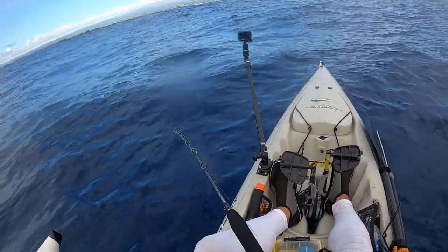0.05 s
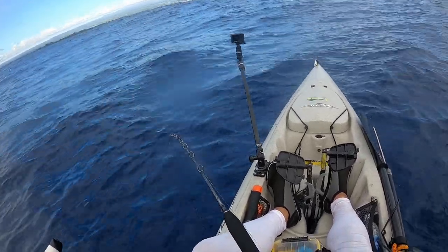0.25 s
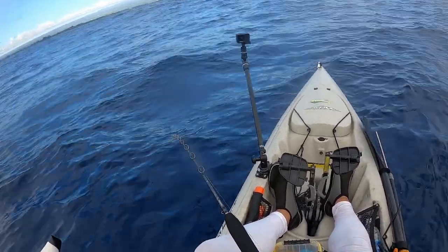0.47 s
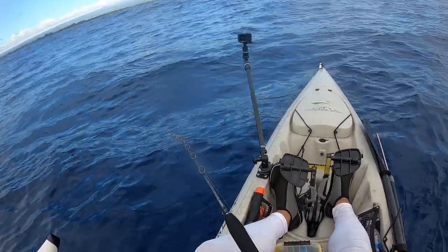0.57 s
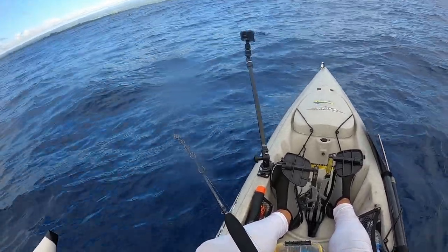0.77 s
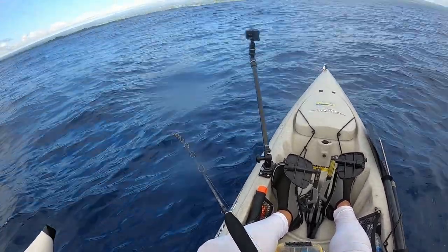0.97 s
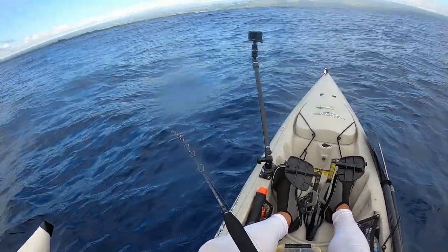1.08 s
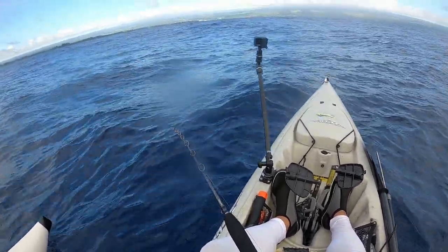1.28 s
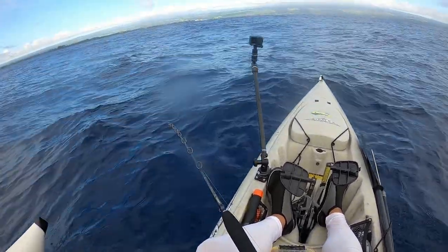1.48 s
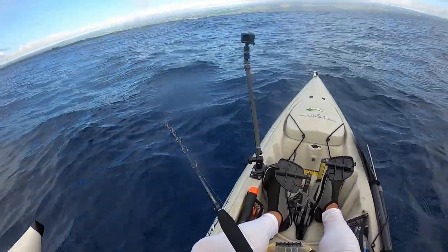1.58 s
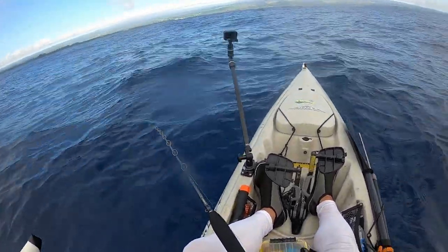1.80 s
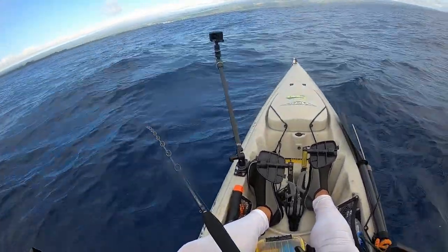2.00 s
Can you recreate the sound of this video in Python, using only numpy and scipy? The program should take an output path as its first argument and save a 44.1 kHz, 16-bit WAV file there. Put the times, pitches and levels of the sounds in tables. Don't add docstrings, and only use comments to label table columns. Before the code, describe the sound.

Water drips, ticks and slaps against a hollow kayak at sea. Low wind thuds build on the on-board microphone to nearly one second, then ease, leaving brighter plops, gurgles and faint spray hiss.

```python
import sys
import numpy as np
from scipy import signal
from scipy.fft import rfft, irfft
from scipy.io import wavfile
from scipy.ndimage import uniform_filter1d

SR = 44100
rng = np.random.default_rng(int(sys.argv[2]) if len(sys.argv) > 2 else 0)


def to_wav(sig):
    pcm = np.clip(np.atleast_2d(sig), -1, 1) * 32767
    pcm = np.round(pcm).astype(np.int16)
    wavfile.write(sys.argv[1], SR, pcm.T)


def linear_from_db(decibels):
    return 10 ** (np.asarray(decibels, float) / 20)


N = 90404

# t/s, peak level/dB, f/Hz, ring t60/s
BUBBLES = [(.003, -30, 1762, 0.023), (0.013, -48.5, 1670, 0.038), (1.038, -53, 3240, 0.0062),
           (1.039, -38, 2050, 0.016), (1.53, -46.5, 1800, 0.015), (1.541, -49.5, 1450, 0.017),
           (1.551, -63, 1030, 0.024), (1.562, -53, 1200, 0.017), (1.587, -51, 514, 0.054),
           (1.598, -39, 425, 0.032), (1.637, -56, 980, 0.048), (1.656, -43, 477, 0.026),
           (0.099, -57, 1114, 0.092), (.101, -44, 2850, 0.012), (0.113, -55, 1440, 0.024),
           (0.163, -52, 1500, 0.04), (0.227, -56, 2594, 0.041), (0.238, -44.5, 1334, 0.065),
           (0.391, -58, 2060, 0.043), (.658, -57, 2184, 0.038), (.666, -59.5, 2070, 0.039),
           (.98, -42, 1377, 0.026), (1.186, -59, 2870, 0.029), (1.27, -61, 1172, 0.059),
           (1.43, -53, 3670, 0.033), (1.438, -52, 3660, .03), (1.481, -36.5, 1053, 0.056),
           (1.494, -34.5, 477, 0.038), (1.513, -42, 1390, 0.054), (1.526, -44, 1040, 0.029),
           (1.571, -36, 382.7, 0.083), (1.634, -49.5, 1855, 0.033), (1.657, -57, 2410, 0.044),
           (1.74, -45, 2000, 0.0095), (1.041, -42, 1780, 0.011), (1.642, -39, 519, 0.032),
           (1.83, -61, 1290, 0.052)]
BUBBLE_RISE_PER_S, POP_DB = 0.61, -15.5
# t/s, length/s, first f/Hz, last f/Hz, rms level/dB
GULPS = [(0.969, 0.068, 599, 1420, -45.5), (1.0332, 0.0041, 1680, 2900, -27.5),
         (.028, 0.012, 1640, 1940, -65), (.262, 0.028, 1343, 1485, -66), (1.568, 0.015, 1090, 1460, -56),
         (1.665, 0.026, 1223, 1520, -62), (1.091, 0.041, 1142, 2600, -55), (1.158, 0.05, 810, 905, -66.5),
         (1.393, 0.063, 472, 529, -47), (1.43, 0.091, 528, 546, -53.5), (1.998, 0.057, 552, 864, -52)]
GULP_BEND, GULP_FADE_DB = 1.4, -6.5

# t/s, peak level/dB, ring f/Hz
EARLY_DROPS = [(.002, -41.5, 3970), (0.101, -54, 4470), (0.11, -58, 9600), (0.114, -46.5, 3750),
               (.137, -48.5, 7850), (.146, -59, 3420), (0.15, -65, 9400), (0.163, -43, 5820),
               (.227, -55.5, 5260), (.238, -54.5, 5900), (.286, -53, 6800), (.345, -50, 3860),
               (.351, -42.5, 3540), (0.38, -60, 2950), (0.547, -51.5, 3980), (.567, -58, 8450),
               (.65, -53.5, 3310), (0.717, -60, 9500), (0.831, -53.5, 4770), (.84, -53, 11100),
               (0.887, -60.5, 4300), (0.987, -60, 4430)]
# t/s, peak level/dB, ring f/Hz
LATER_DROPS = [(1.025, -52, 7400), (1.072, -40.5, 5320), (1.077, -44.5, 3470), (1.082, -48.5, 5000),
               (1.101, -57, 3970), (1.193, -55.5, 7140), (1.202, -55.5, 4520), (1.32, -40.5, 5160),
               (1.33, -50, 6900), (1.347, -53, 3900), (1.417, -48, 8000), (1.448, -45.5, 6520),
               (1.48, -52.5, 2930), (1.544, -56, 4860), (1.587, -57.5, 8100), (1.635, -51, 7900),
               (1.656, -53, 3460), (1.661, -41.5, 4920), (1.669, -42.5, 7060), (1.725, -61.5, 3160),
               (1.845, -55, 3400), (1.921, -49.5, 8500), (1.989, -55.5, 3850), (2.044, -52, 8700)]
# t/s, peak level/dB, ring f/Hz
FAINT_DROPS = [(.295, -57.5, 11600), (.301, -64, 4180), (.392, -62.5, 2960), (.405, -67, 7800),
               (.962, -64.5, 5400), (.986, -56.5, 7300), (1.064, -55, 4900), (1.185, -59, 4950),
               (1.269, -64, 4200), (1.301, -62, 8500), (1.307, -57, 5300), (1.317, -58, 5300),
               (1.388, -63, 6500), (1.424, -53, 7700), (1.436, -52, 4370), (1.444, -62, 1740),
               (1.526, -61, 9000), (1.564, -56, 12100), (1.593, -57, 11800), (1.598, -62, 5550),
               (1.628, -54, 9800), (1.65, -52, 5160), (1.68, -61, 3850), (1.753, -52, 11400),
               (1.851, -52, 6150), (1.895, -58, 6200), (1.995, -53, 6260)]
DROP_CYCLES, TICK_DB, TICK_T60_S = 39.4, -8.5, 0.021
# t/s, peak level/dB, lowest f/Hz, highest f/Hz
SLAPS = [(0.0983, -65, 1000, 6000), (0.1138, -55, 1400, 7940), (0.3474, -58, 1960, 13900),
         (0.352, -43.5, 455, 9000), (0.354, -42, 705, 3000), (0.1637, -42, 3070, 8800),
         (0.358, -54, 2500, 12000), (1.0719, -36.5, 1170, 15000), (1.0824, -32, 2000, 13800),
         (1.344, -62, 895, 5050), (1.478, -48.5, 1200, 5000), (1.5125, -50, 3000, 14000),
         (1.6575, -48, 2500, 8900)]
SLAP_T60_S, SLAP_GRIT, SLAP_DULL = 0.003, 0.43, 0.88

# t/s, level/dB
WASH = [
    (0, -84),
    (.6, -77),
    (1.25, -79.5),
    (1.5, -76.5),
    (2.05, -78),
]
# f/Hz, level per Hz/dB
WASH_COLOUR = [(350, -42), (600, -3), (818, -2.5), (1240, 0), (2400, -13), (4340, -14), (15000, -27.5)]
WASH_GAIN_DB = 3.5
SPRAY_GAIN_DB, SPRAY_PER_S, SPRAY_SCATTER_DB = 7, 420, 3.5
# t/s, length/s, level/dB, middle f/Hz
SPLASHES = [(0.101, 0.028, -56, 2590), (0.332, 0.06, -62.5, 4170), (0.965, 0.13, -63, 1496),
            (1.047, 0.016, -60, 1970), (1.064, 0.03, -52.5, 5200), (1.554, 0.6, -70.5, 7600),
            (1.509, .11, -69.5, 910), (1.329, 0.2, -69, 3860), (1.425, 0.04, -58.5, 5150),
            (1.479, 0.11, -61.5, 2020), (1.626, 0.048, -60.5, 2670), (1.806, 0.013, -55.5, 1820),
            (2.024, 0.027, -63.5, 1780)]
CLOUD_PER_S, CLOUD_OCTAVES = 1900, 0.763

# t/s, level/dB
GUST = [
    (0, -43.5),
    (.33, -41),
    (.5, -38),
    (.93, -37),
    (.99, -43),
    (1.4, -44),
    (2.05, -45.5),
]
# f/Hz, level per Hz/dB
WIND_COLOUR = [(12, -38), (20, 4), (44, -3), (91, -5.5), (161, -9.5), (229, -14), (268, -18.5),
               (644, -42.5), (900, -63), (1170, -112), (1980, -120)]
WIND_DB, GUST_REF_DB, GUST_CORNER_HZ = -38.5, -41.5, 119
# t/s, level/dB
SLOP = [
    (0, -66),
    (.45, -60.5),
    (.95, -50),
    (2.05, -57.5),
]
SLOP_REF_DB, SLOP_CORNER_HZ = -56, 236
# t/s, peak level/dB, f/Hz
BUFFETS = [(0.221, -32.5, 48), (0.359, -30, 40.4), (0.473, -21.5, 55.5), (0.511, -25, 71.7),
           (0.541, -25, 69), (0.586, -28, 62.6), (0.622, -27.5, 44.5), (0.724, -24.5, 60),
           (0.841, -25, 44.2), (0.866, -20.5, 57.4), (0.915, -16, 70), (0.939, -23, 46.3),
           (0.167, -33, 50.7), (0.421, -32, 44.5), (1.17, -34.5, 117), (1.328, -35.5, 57),
           (1.409, -30.5, 49.4), (1.556, -33, 53.5), (1.592, -33, 72)]
BUFFET_CYCLES, BUFFET_PAN_DB, BUFFET_UNLIKE_RAD = 0.75, 1.2, 0.8
# t/s, left minus right level/dB
LEAN = [
    (0, -0.5),
    (.45, 2),
    (.65, 0.1),
    (2.05, 0.7),
]

# f/Hz, likeness/0-1
ALIKE = [(25, .1), (60, .4), (125, .55), (250, .78), (500, .86), (4000, .75), (9000, .3)]
PORT_LAG_PER_DB = 0.85
DECK_DB, DECK_T60_S = -8.5, 0.024
MIC_TOP_HZ = 10500


def bubbles():
    out = np.zeros((2, N))
    noise = rng.standard_normal((len(BUBBLES), 400))
    for (s, db, hz, t60), n in zip(BUBBLES, noise):
        pan_db = 1.5 * n[-1]
        pop = burst(n, 0.024, 0.98 * hz, 2.7 * hz)
        add(out, s, linear_from_db(db) * ring(hz, t60, BUBBLE_RISE_PER_S), pan_db)
        add(out, s, linear_from_db(db + POP_DB) * pop, pan_db)
    for s, length, first_hz, last_hz, db in GULPS:
        u = np.arange(int(length * SR)) / SR / length
        hz = first_hz * (last_hz / first_hz) ** (u ** GULP_BEND)
        edges = np.minimum(1, np.minimum(u / 0.052, (1 - u) / 0.12))
        glide = np.sin(2 * np.pi * np.cumsum(hz) / SR)
        add(out, s, linear_from_db(db - 2.0 + GULP_FADE_DB * u) * edges * glide, -1)
    return out * (1 + 0.15 * walk(180))


def drops():
    out = np.zeros((2, N))
    rows = EARLY_DROPS + LATER_DROPS + FAINT_DROPS
    for (s, db, hz), n in zip(rows, rng.standard_normal((len(rows), 500))):
        pan_db = 0.8 + 1.8 * n[-1]
        tick = burst(n, TICK_T60_S, 0.46 * hz, min(2.26 * hz, SR / 2.2))
        tick_db = db + TICK_DB - 18.0 * np.log2(hz / 4000)
        add(out, s, linear_from_db(db) * ring(hz, DROP_CYCLES / hz), pan_db)
        add(out, s, linear_from_db(tick_db) * tick, pan_db)
    for (s, db, lo_hz, hi_hz), n in zip(SLAPS, rng.standard_normal((len(SLAPS), 500))):
        click = np.arange(len(n)) == 0
        crack = burst(SLAP_GRIT * n + click, SLAP_T60_S, lo_hz, hi_hz)
        crack = signal.lfilter([1], [1, -SLAP_DULL], crack)
        add(out, s, linear_from_db(db) * crack / np.abs(crack).max(), 0.73 * np.sign(n[-1]))
    return out


def sea():
    wash_db = line(WASH)
    crackle_db = 2.52 * walk(190)
    hiss = shaped(WASH_COLOUR, 470, 15500, 2.8, 59.9, lambda hz: crackle_db * min(hz / 4000, 1))
    out = linear_from_db(WASH_GAIN_DB + wash_db) * hiss

    chance = rng.random((1500, 5))
    times = np.cumsum(-np.log(chance[:, 0])) / SPRAY_PER_S
    times = times[times < N / SR]
    spray_db = SPRAY_GAIN_DB + wash_db[(times * SR).astype(int)]
    add_grains(out, times, chance[:, 1:], 900, 2.3, spray_db)

    for (s, length, db, hz), chance in zip(SPLASHES, rng.random((len(SPLASHES), 400, 5))):
        late = np.cumsum(-np.log(chance[:, 0])) / CLOUD_PER_S / length
        late = late[late < 1.3]
        low_hz = hz / 2 ** CLOUD_OCTAVES
        add_grains(out, s + late * length, chance[:, 1:], low_hz, 2.18 * CLOUD_OCTAVES, db - 9 * late)
    return out


def add_grains(out, times, chance, low_hz, octaves, db):
    for s, level_db, (pitch, size, cycles, side) in zip(times, db, chance):
        hz = min(low_hz * 2 ** (octaves * pitch), 14000)
        level_db = level_db - SPRAY_SCATTER_DB * np.log(size + 0.019) - 3.15 * octaves * pitch
        t60 = (5 + 40 * cycles ** 2) / hz
        add(out, s, linear_from_db(level_db) * ring(hz, t60, 12), 7 * (side - 0.42))


def wind():
    slop_db = line(SLOP) - SLOP_REF_DB
    gust_db = line(GUST) - GUST_REF_DB

    def swell_db(hz):
        gust_part = gust_db / (1 + (hz / GUST_CORNER_HZ) ** 3)
        slop_part = slop_db / (1 + (SLOP_CORNER_HZ / hz) ** 4)
        return gust_part + slop_part

    out = linear_from_db(WIND_DB) * shaped(WIND_COLOUR, 20.22, 1000, 2.33, 13.42, swell_db)
    t = np.arange(-3000, 3000) / SR
    turns = rng.standard_normal((len(BUFFETS), 2))
    for (s, db, hz), turn in zip(BUFFETS, turns):
        swing = np.cos(2 * np.pi * hz * t + BUFFET_UNLIKE_RAD * turn[:, None])
        thud = swing * np.exp(-(t * hz / BUFFET_CYCLES) ** 2)
        add(out, s + t[0], thud * linear_from_db(db), BUFFET_PAN_DB)
    return out


def ring(hz, t60, rise=0):
    t = np.arange(int(t60 * SR) + 2) / SR
    phase = 2 * np.pi * hz * (t + rise * t ** 2 / 2) - 1.5 * np.exp(-t * hz / 6)
    return np.sin(phase) * linear_from_db(-60 * t / t60) * np.minimum(t * hz, 1)


def burst(noise, t60, lo_hz, hi_hz):
    fade = linear_from_db(-60 * np.arange(len(noise)) / SR / t60)
    band = signal.butter(2, [lo_hz, hi_hz], "bandpass", fs=SR)
    return signal.lfilter(*band, noise * fade)


def shaped(colour, lo_hz, hi_hz, flicker_db, flicker_per_s, swell_db):
    f = np.fft.rfftfreq(N, 1 / SR) + 1e-6
    colour_hz, colour_db = np.array(colour).T
    alike_hz, alike = np.array(ALIKE).T
    tint = linear_from_db(np.interp(np.log(f), np.log(colour_hz), colour_db))
    like = np.interp(np.log(f), np.log(alike_hz), alike)
    mid, side = rfft(rng.standard_normal((2, N))) * tint * np.sqrt([1 + like, 1 - like])

    centres = lo_hz * 2 ** np.arange(0, np.log2(hi_hz / lo_hz), 1 / 3)
    bands = [np.clip(1 - (3 * np.log2(f / c)) ** 2, 0, 1) ** 2 for c in centres]
    whole = sum(bands)
    rms = np.sqrt(np.mean(irfft(mid * whole, N) ** 2 + irfft(side * whole, N) ** 2))
    ports = np.array([mid + side, mid - side])
    out = np.zeros((2, N))
    for c, band in zip(centres, bands):
        out += irfft(ports * band, N) * linear_from_db(flicker_db * walk(flicker_per_s) + swell_db(c))
    return out / rms


def walk(rate):
    k = int(SR / rate)
    held = np.repeat(rng.standard_normal(N // k + 1), k)
    return 1.3 * uniform_filter1d(uniform_filter1d(held, k), k)[:N]


def line(table):
    return np.interp(np.arange(N) / SR, *np.array(table).T)


def add(out, s, sound, pan_db):
    lag = int(np.clip(np.round(pan_db * PORT_LAG_PER_DB), -2, 2))
    for port, sign in enumerate((1, -1)):
        i = max(int(s * SR), 0) + max(-sign * lag, 0)
        piece = sound[port] if sound.ndim > 1 else sound
        piece = piece[:max(N - i, 0)]
        out[port, i:i + len(piece)] += piece * linear_from_db(sign * pan_db / 2)


def scene():
    f = np.fft.rfftfreq(N, 1 / SR)
    deck = rng.standard_normal(1500) * linear_from_db(-60 * np.arange(1500) / SR / DECK_T60_S)
    deck = rfft(deck / np.sqrt(np.sum(deck ** 2)), N) * np.array([[1], [-1]])
    mic = 1 / np.sqrt(1 + (f / MIC_TOP_HZ) ** 4)
    water = rfft(bubbles() + drops() + sea()) * mic * (1 + linear_from_db(DECK_DB) * deck)
    lean = linear_from_db(line(LEAN) * np.array([[0.5], [-0.5]]))
    return irfft(water, N) + wind() * lean


def top_cut(x):
    return signal.sosfilt(signal.butter(12, 15780, fs=SR, output="sos"), x)


def record(dry):
    return top_cut(dry)


dry = scene()
out = record(dry)
to_wav(out)
```